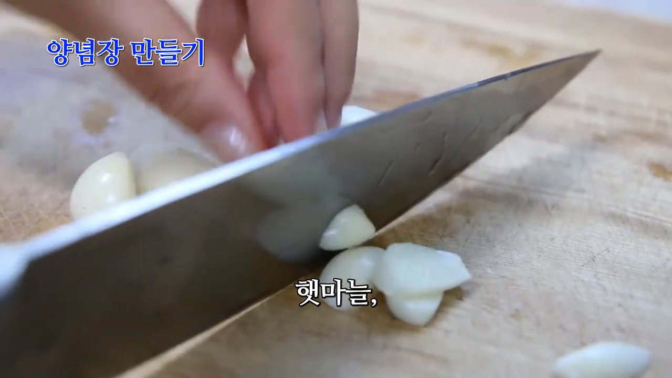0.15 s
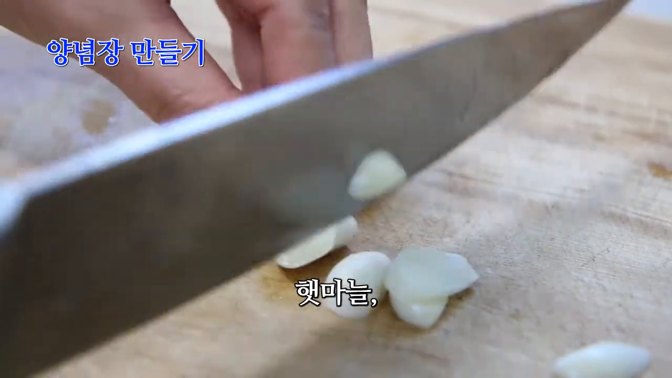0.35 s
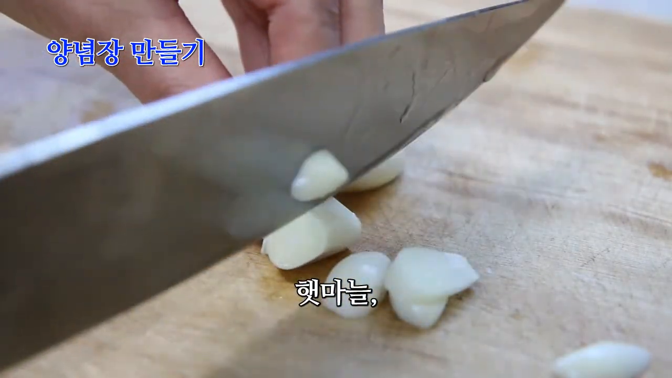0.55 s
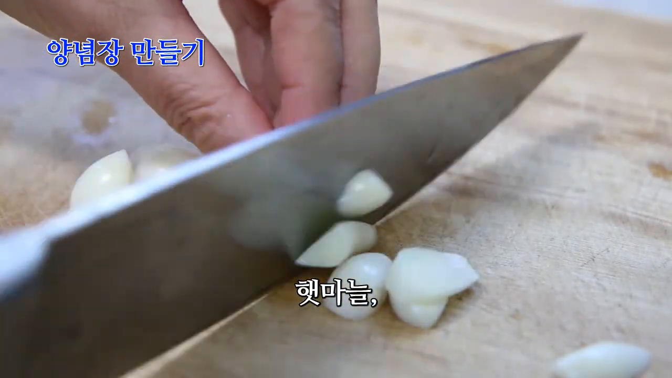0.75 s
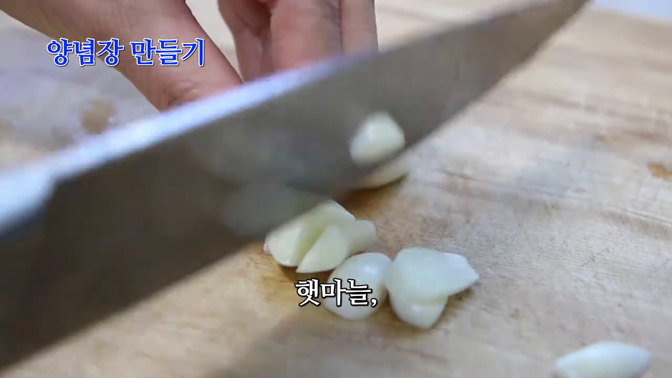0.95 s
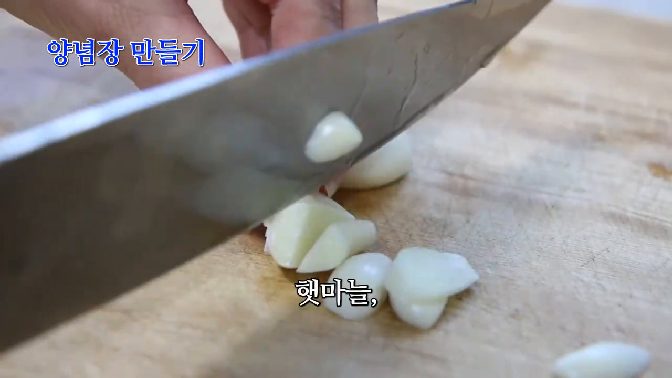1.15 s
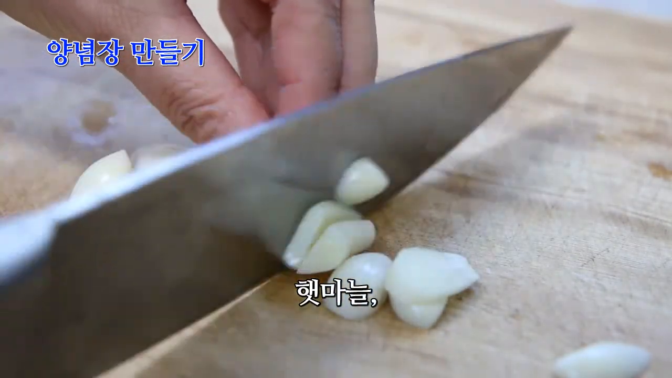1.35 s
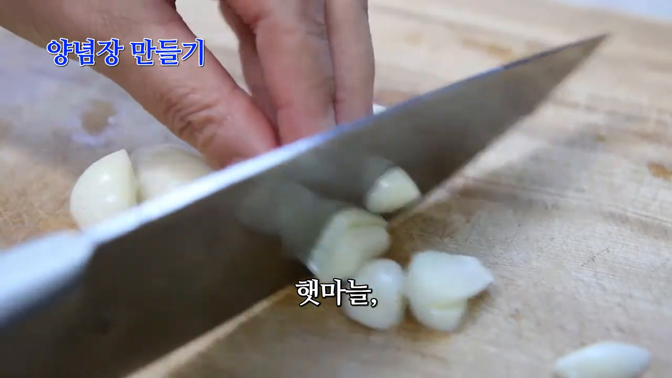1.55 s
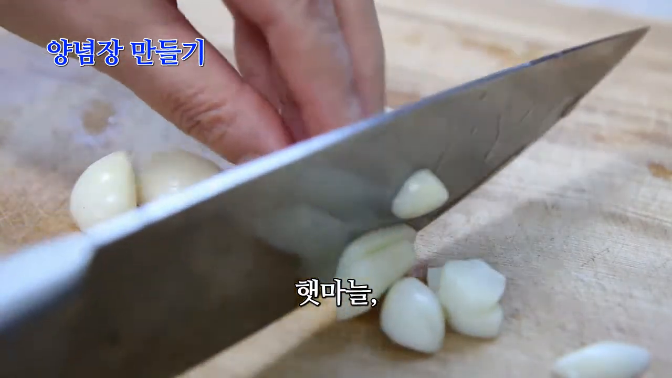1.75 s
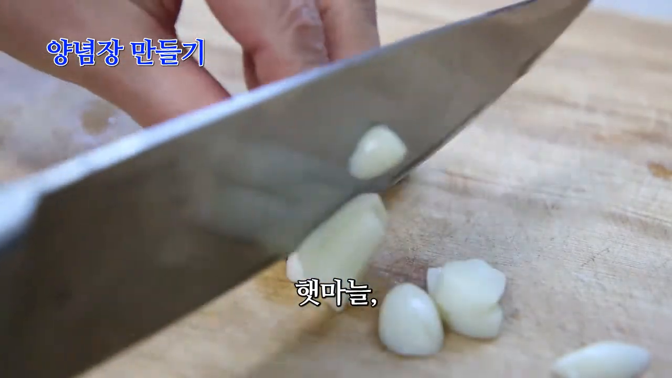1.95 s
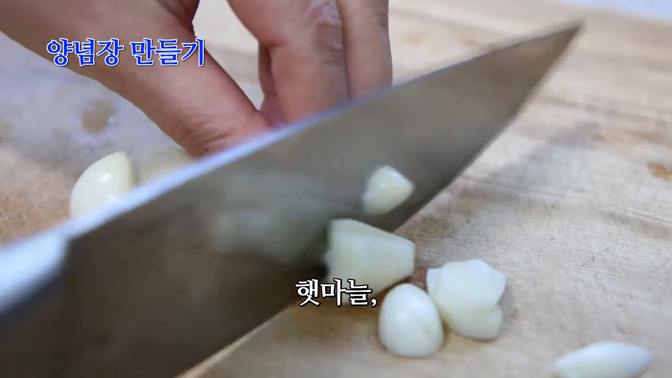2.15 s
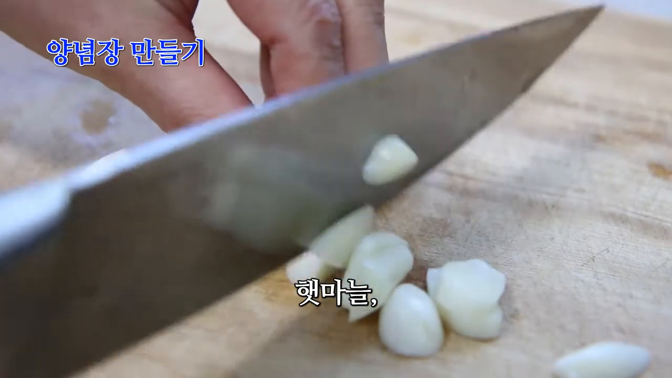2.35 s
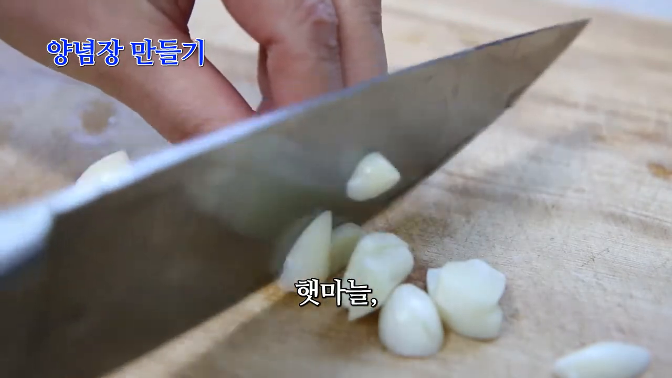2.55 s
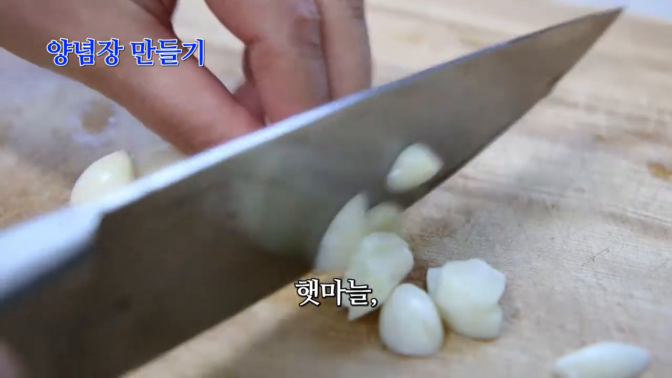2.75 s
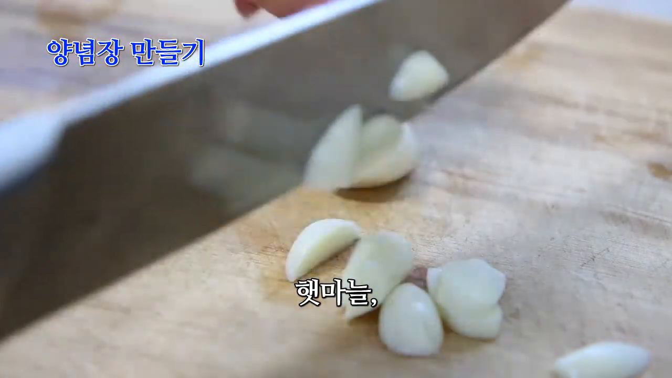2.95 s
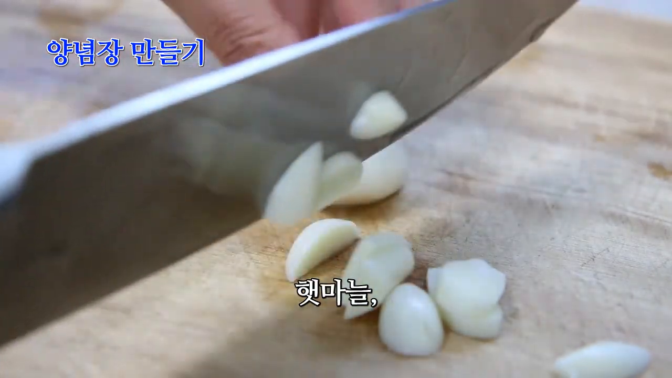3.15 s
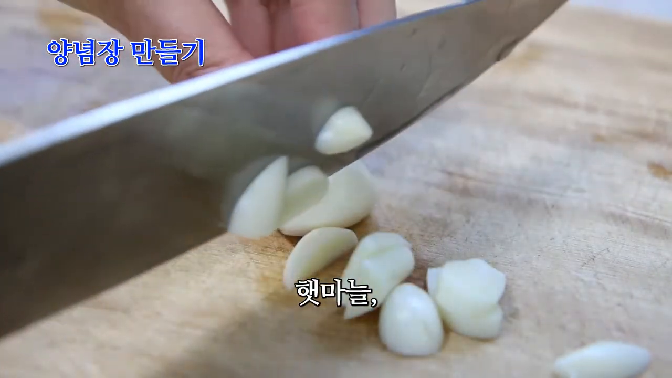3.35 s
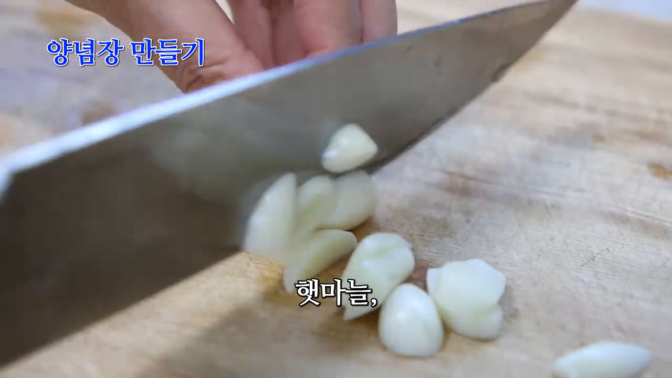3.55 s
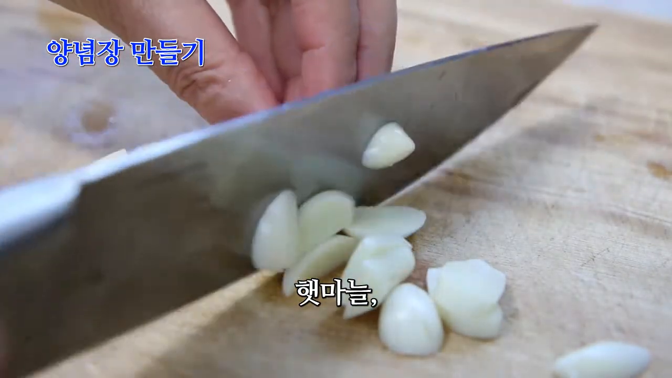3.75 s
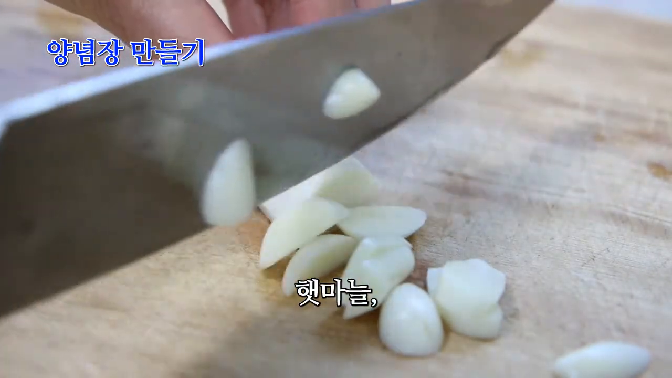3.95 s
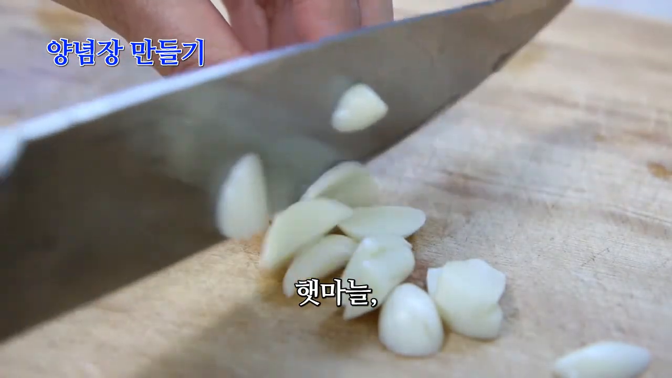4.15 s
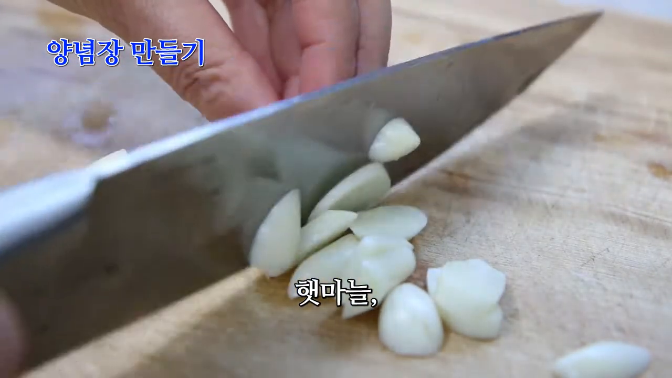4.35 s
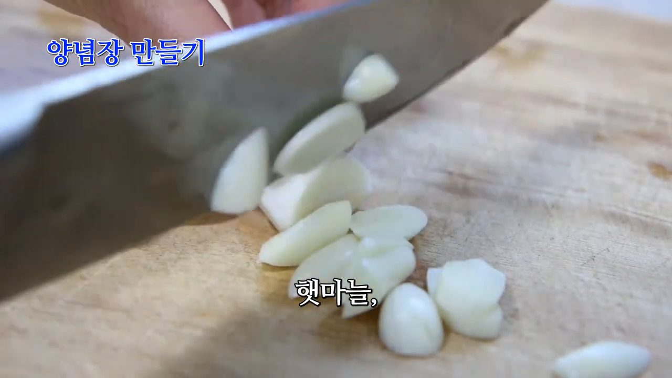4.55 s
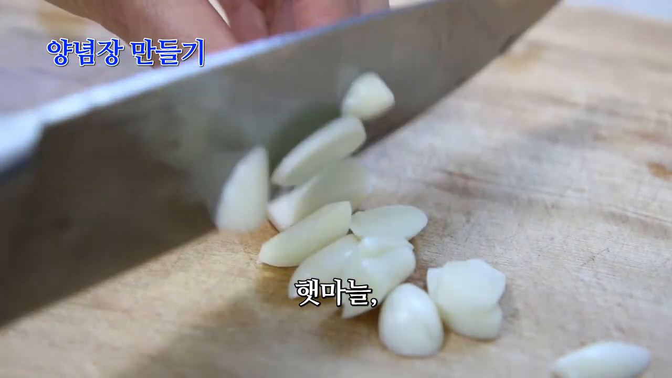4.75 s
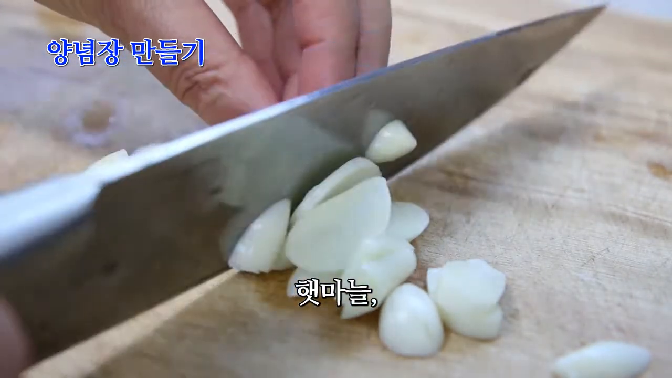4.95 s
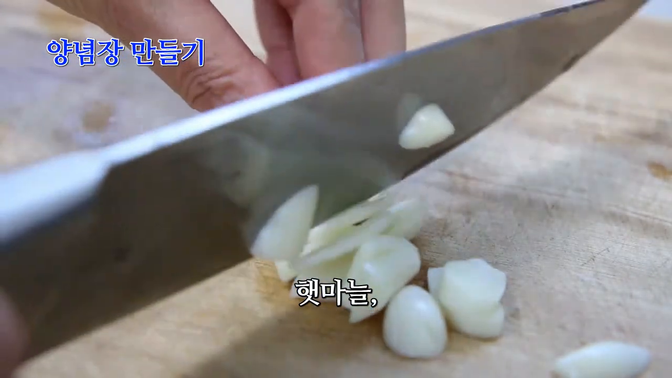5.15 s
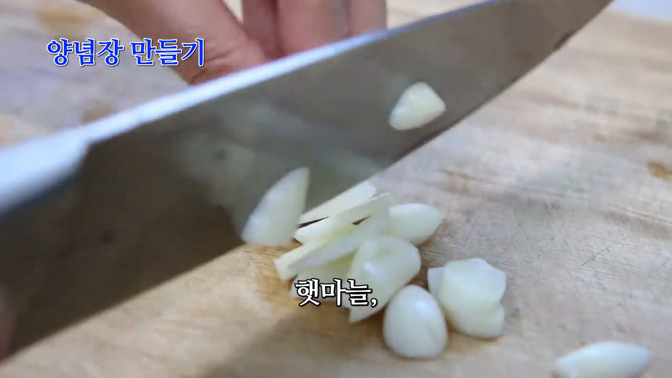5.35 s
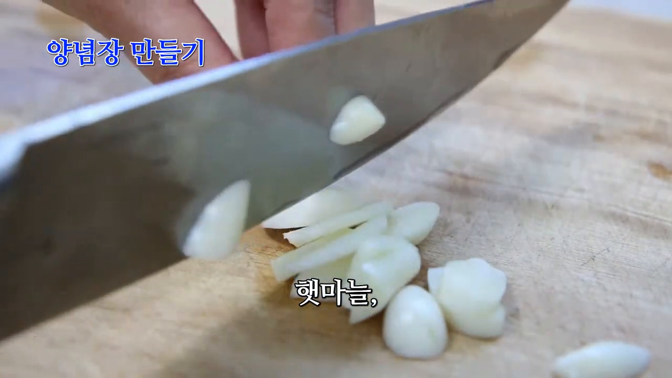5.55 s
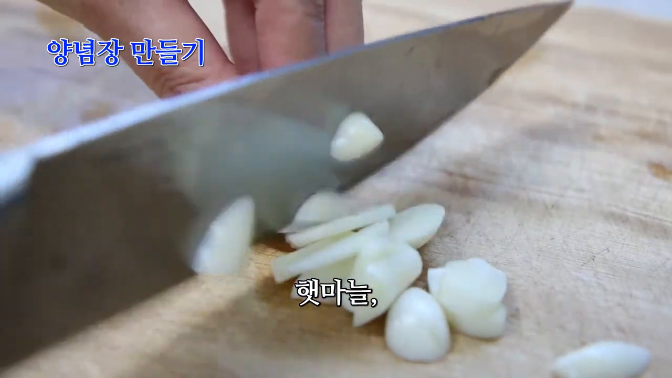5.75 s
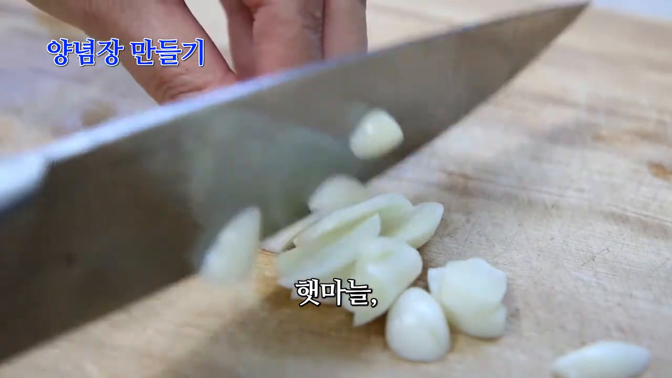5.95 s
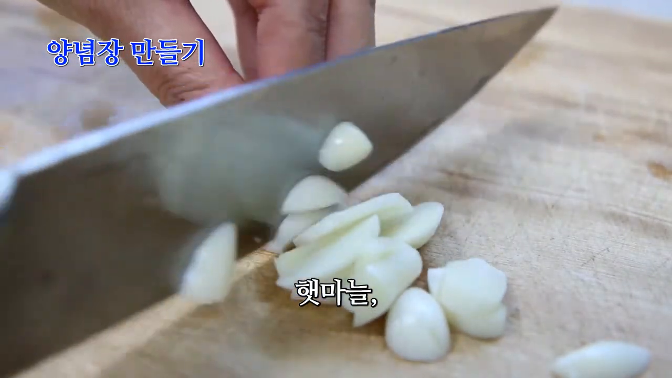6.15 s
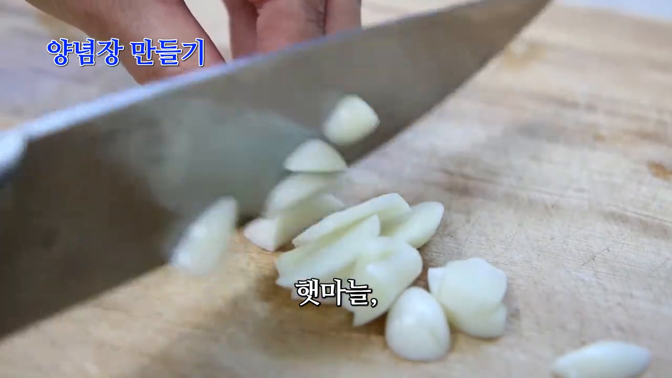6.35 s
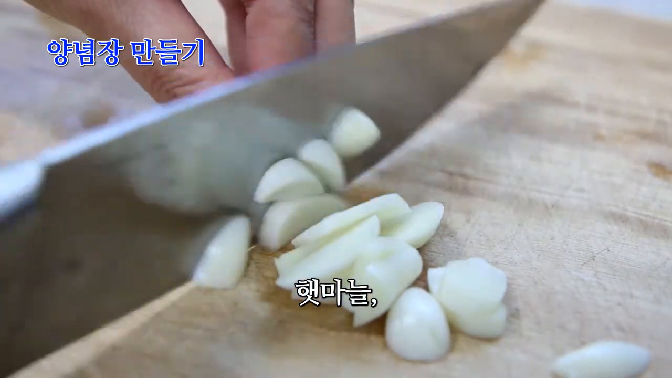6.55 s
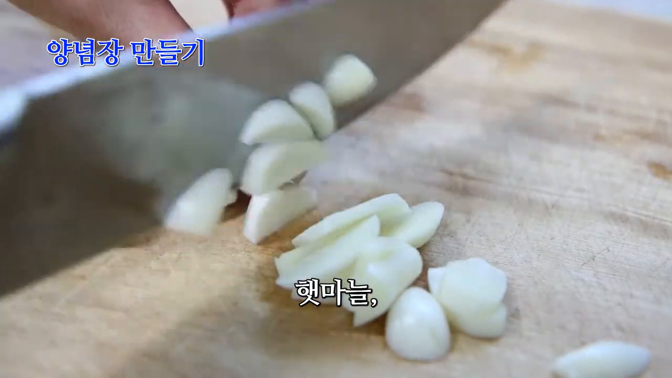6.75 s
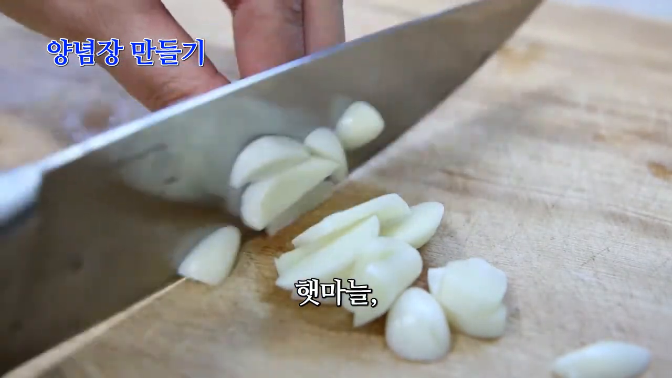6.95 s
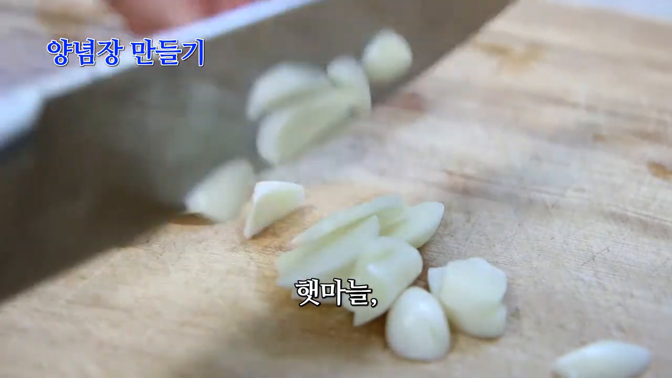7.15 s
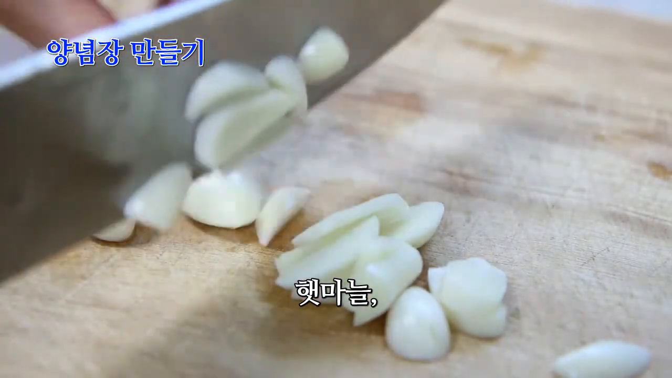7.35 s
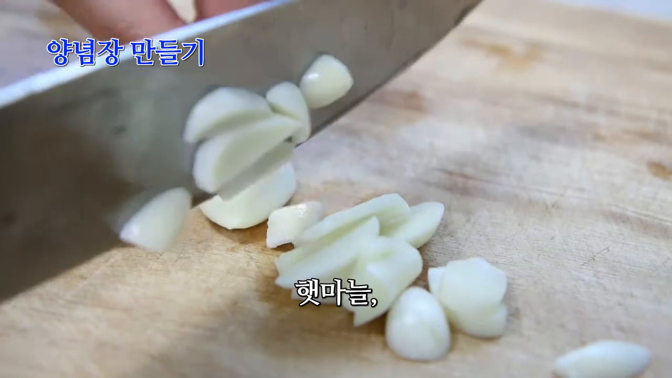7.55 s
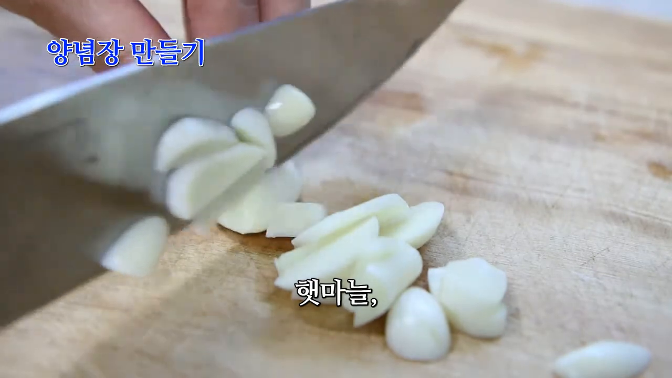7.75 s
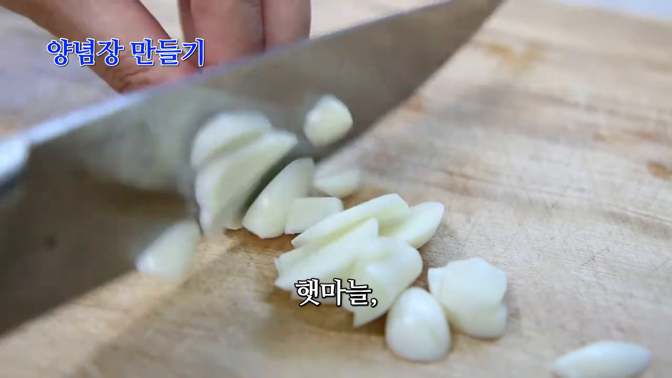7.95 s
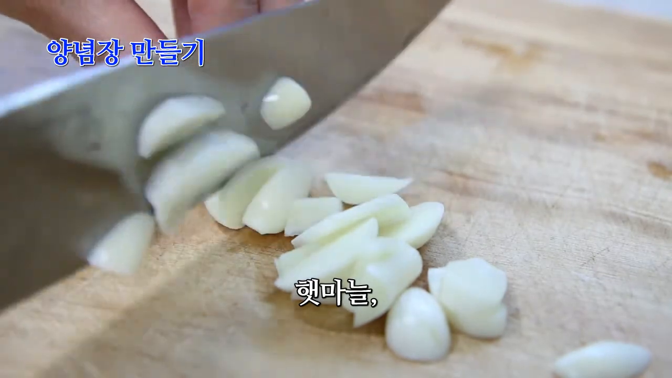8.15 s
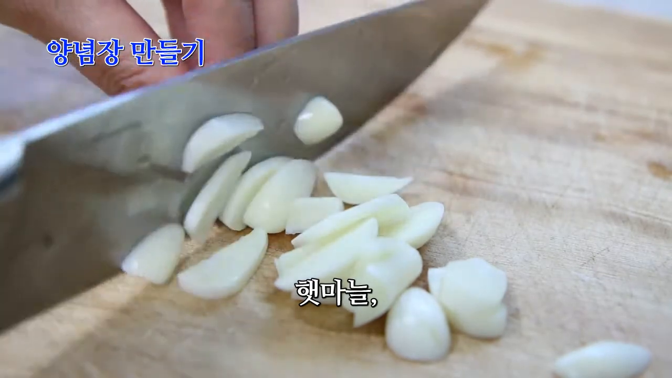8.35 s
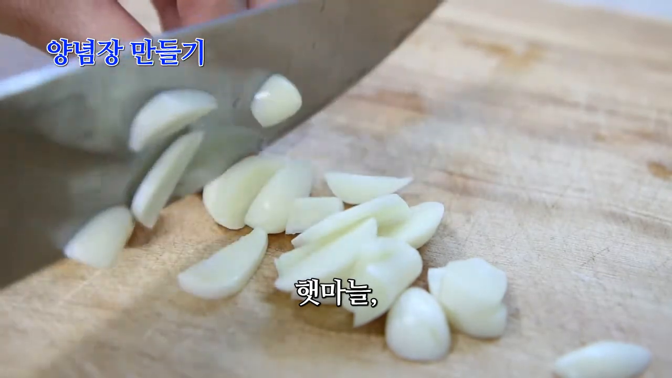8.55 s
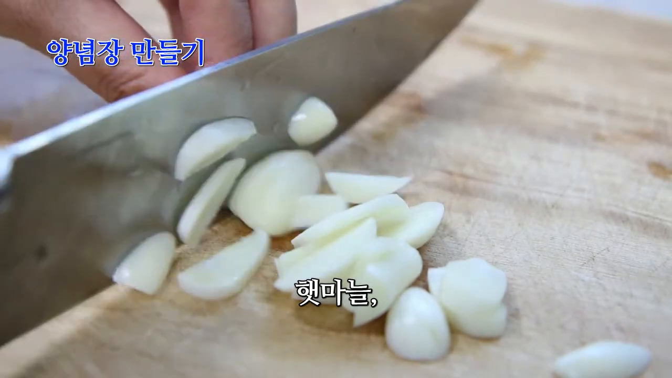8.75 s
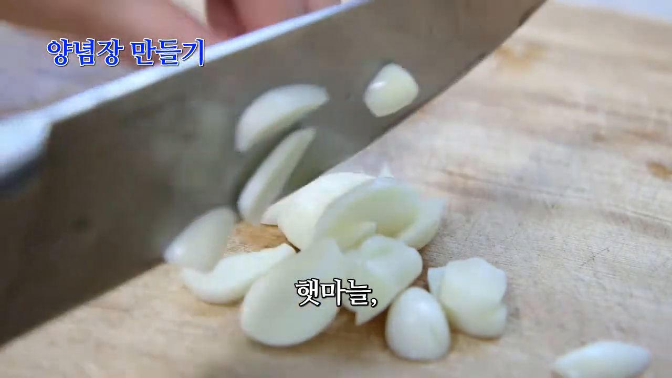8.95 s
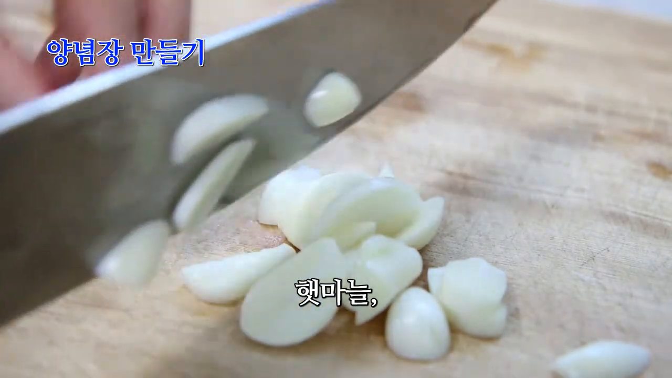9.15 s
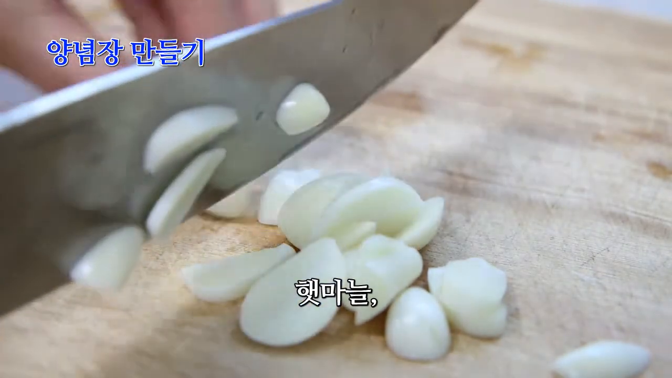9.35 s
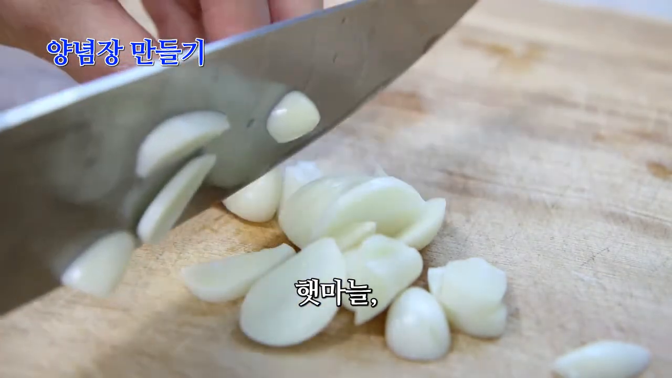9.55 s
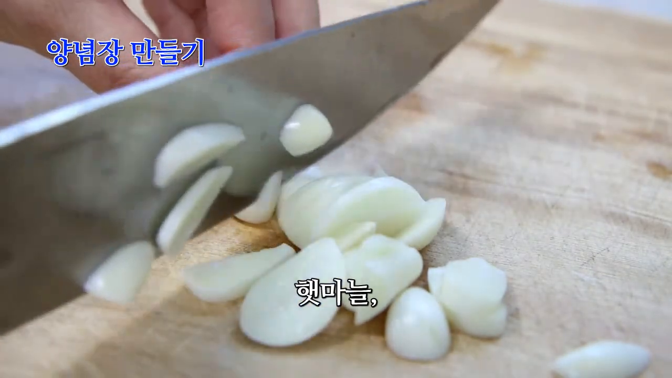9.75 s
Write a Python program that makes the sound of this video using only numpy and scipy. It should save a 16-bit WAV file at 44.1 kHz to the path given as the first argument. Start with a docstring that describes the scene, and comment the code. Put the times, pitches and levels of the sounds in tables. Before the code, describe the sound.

A kitchen knife slices garlic on a wooden board, each slow stroke a wet crisp crunch ending in a hard woody knock, close up.

```python
"""A chef's knife slices garlic on a wooden board in a small kitchen, close to the microphones.
On each stroke, bursting garlic cells crunch ever louder, then the knife knocks on the board.
Random clicks make the crunch; dying sines make the ringing board and blade.
Small bites, rubs and soft thuds fall around the strokes. Fading noise is the room's answer.
Behind it all, a wavering tone is an appliance's hum and steady noise is the room's air."""
import sys
import numpy as np
from scipy import signal
from scipy.fft import rfft, irfft
from scipy.io import wavfile
from scipy.ndimage import uniform_filter1d

SR = 44100
rng = np.random.default_rng(int(sys.argv[2]) if len(sys.argv) > 2 else 0)


def pcm_store(signal):
    """Save signal as 16-bit PCM."""
    levels = np.round(np.clip(np.atleast_2d(signal), -1, 1) * 32767)
    wavfile.write(sys.argv[1], SR, levels.astype(np.int16).T)


N = 432180  # length in samples
TIME = np.arange(N) / SR  # seconds

# Knife strokes; crunch and crack are relative levels, before colouring:
# [knock t/s, push on the board level/dB, cut length t/s, crunch at its end level/dB,
#  crack as the clove parts level/dB]
STROKES = [(.8720, 4.5, 0.21, -42.5, -29), (1.4776, 2, .16, -34, -37), (2.2820, 2, .12, -40.5, -27),
           (2.7160, 1.5, .12, -38, -25), (3.744, 5.5, 0.14, -36.5, -19), (4.3622, 4, .16, -37.5, -23),
           (4.9577, 5.5, .16, -36, -24.5), (5.9093, 6.5, .14, -43.5, -44), (6.3158, .5, .15, -43, -44),
           (6.6844, 1, .15, -40, -48), (7.0499, 1, .13, -43.5, -52), (7.9577, 2.5, 0.12, -33.5, -33),
           (8.3611, 2, .115, -32.5, -37), (8.7704, 2, .14, -38, -26.5)]
# The edge bites into a clove's skin; levels are relative:
# [t/s, crackle level/dB, blade ring level/dB, centre of the ring f/Hz]
SKIN_BITES = [(0.6167, -48, -50.5, 4300), (1.2243, -38.5, -36, 1160), (2.14, -39.5, -43.5, 1400),
              (2.5593, -42.5, -31.5, 4130), (4.0228, -50.5, -47.5, 3200), (4.69, -44, -41.5, 1460),
              (5.592, -46.5, -43, 6100), (5.8883, -33, -29, 5840), (6.1833, -38, -33.5, 1600),
              (6.5263, -49.5, -41.5, 1840), (6.9504, -40, -36.5, 1390), (7.797, -42.5, -39.5, 1160),
              (8.2359, -39.5, -34.5, 1430), (8.5786, -43.5, -47, 1500), (8.626, -48, -39, 1440)]
# Soft thuds: the first row is the fading thud of an earlier knock,
# in the others fingers nudge clove and blade on the board: [t/s, push level/dB]
SOFT_THUDS = [(.006, -16.5), (.107, -18), (.434, -22), (1.872, -21), (3.2075, -27)]


def cutting(blade_db=-43, blade_follows=0.61, release_s=0.0087, entry_s=0.015, crack_s=0.0015):
    """Garlic tears ever louder as the edge sinks in, and cracks as the edge meets the wood."""
    swell_db, swell_bend = 23.5, 1.26  # the rise is quick at first, then levels off towards the knock
    sound = np.zeros((2, N))
    t = TIME[:SR // 4]
    for knock_s, _, length_s, crunch_db, crack_db in STROKES:
        to_go = np.maximum(1 - t / length_s, 0)  # share of the cut still ahead
        after_s = np.maximum(t - length_s, 0)
        level_db = crunch_db - swell_db * to_go ** swell_bend
        gate = (1 - np.exp(-t / entry_s)) * np.exp(-after_s / release_s)
        crack = amp(crack_db) * (t > length_s) * np.exp(-after_s / crack_s)
        tear = amp(5) * (gate * amp(level_db) + crack)
        # the blade's ring grows less steeply than the crunch
        shake = gate * amp(blade_db + blade_follows * (level_db + 42.5))
        stroke = cut(tear, shake, centre_hz=1530, octaves=9.0, clump_db=3.0)
        add(sound, knock_s - length_s, stroke)
    return sound


def cut(tear, shake, centre_hz, octaves, clump_db=1.5, shared=0.99):
    """Cells burst in clumps and set the blade ringing, most strongly in the modes near centre_hz."""
    # The blade held in the clove, relative levels; time to fall by 60 dB: [f/Hz, level/dB, t/s]
    blade_modes = [(1127, -2, 0.053), (1390, -13, 0.012), (1448, 3, 0.017), (2220, -0.5, 0.012),
                   (2490, -2.5, 0.011), (3450, 2, 0.017), (4260, 3.5, 0.0065), (5700, 7, 0.0036)]
    # Spectrum of tearing garlic cells, relative, per Hz: [f/Hz, level/dB]
    crunch_spectrum = [(100, -20), (450, -3), (800, -6.5), (1800, 0.5), (4000, -1.5), (5600, -1),
                       (8000, -1.5), (10500, -1.5), (13000, -5.5), (16000, -9)]
    size = len(tear)
    modes = []
    for hz, db, t60 in blade_modes:
        distance = np.log2(hz / centre_hz) / octaves
        modes.append((hz, db - 6 * distance ** 2, t60))
    steel = ring(modes, rise_s=0.00005)
    steel = steel / np.linalg.norm(steel[0])
    sound = through(shake * bursts(size, per_s=12000, spread_db=0.4), steel)

    slow_noise = unit(uniform_filter1d(rng.standard_normal(size), size=180))
    clumps = unit(amp(clump_db * slow_noise))
    # the blade shades each microphone from the cells on its far face
    both, left, right = (bursts(size, per_s=5000, spread_db=1.0) for _ in range(3))
    clicks = unit(shared * both + np.array([left, right]))
    cells = colour(tear * clumps * clicks, crunch_spectrum)
    add(sound, 0, amp(2.0) * through(cells, worktop(scatter_db=3.5, t60=0.033)))
    return sound


def bursts(size, per_s, spread_db):
    """Cells burst at random, as clicks of uneven size."""
    loudness = amp(spread_db * np.minimum(rng.exponential(1, size), 4))
    clicks = loudness * rng.standard_normal(size)
    return unit(clicks * (rng.random(size) < per_s / SR))


def worktop(scatter_db, t60):
    """The direct sound is joined by quick scatter off board, hand and blade; energy is 1 in all."""
    t = TIME[:SR // 32]
    scatter = unit(diffuse(size=len(t)) * amp(-60 * t / t60))
    response = amp(scatter_db) * scatter / np.sqrt(len(t))
    response[:, 0] += 1  # the direct sound
    return response / np.linalg.norm(response[0])


def knocks(low_cut_hz=70, order=3):
    """The board rings under each push; nearby surfaces and then the room throw it back."""
    # The board with the knife on it, relative levels; time to fall by 60 dB: [f/Hz, level/dB, t/s]
    board_modes = [(99.7, -32.5, 0.21), (149, -37, 0.4), (169.7, -24.5, 0.12), (303.4, -22.5, 0.248),
                   (389, -22.5, 0.13), (403, -16, 0.15), (505, -28, 0.011), (545, -6.5, 0.04),
                   (611.6, -18.5, 0.11), (672.3, -27.5, 0.29), (706.6, -9.5, 0.029), (853, -20.5, 0.16),
                   (999, -24, 0.5), (1085, 1, 0.026), (1127, -10, 0.084), (1250, 0, 0.0071),
                   (1237.5, -16, 0.09), (1372, -0.5, 0.021), (1640, -14, 0.065), (1718, -20, 0.15),
                   (2058, -11.5, 0.066), (2233, 2, 0.012), (2497, -16, 0.093), (3073, -18, 0.077),
                   (3457, -11.5, 0.035)]
    # Spectrum of the knock sent out into the room, relative, per Hz: [f/Hz, level/dB]
    room_spectrum = [(40, -22), (80, -12), (135, -3.5), (245, -12), (330, -1.5), (450, 25.5), (640, -10.5),
                     (850, 5), (1060, 3), (1400, -2.5), (2200, -2), (3000, -8.5), (5000, -26), (12000, -73)]
    # Echoes off worktop, cupboards and walls, relative to the direct knock: [delay t/ms, level/dB]
    knock_echoes = [(5.5, -18), (11.9, -18.5), (20.4, -25), (27.5, -18.5), (46.5, -19.5), (71.5, -22.5)]
    bite_push_db = 10  # a bite's push on the board, above its blade ring
    contact_ms, harden = 0.24, 1.38  # contact of a 0 dB chop; dB it shortens for each dB of push
    force = np.zeros(N)
    direct = np.zeros((2, N))
    bites = [(s, ring_db + bite_push_db) for s, _, ring_db, _ in SKIN_BITES]
    for s, push_db in bites + SOFT_THUDS:
        add(force, s, amp(push_db) * blow(contact_ms=0.47))
    add(direct, 0, through(force, ring(board_modes, rise_s=0.0013)))
    for s, push_db, *_ in STROKES:
        # a harder chop is shorter and brighter
        push = amp(push_db) * blow(contact_ms * amp(-harden * push_db))
        add(force, s, push)
        add(direct, s, through(push, ring(board_modes, rise_s=0.0019)))
    sound = direct + amp(34) * through(force, kitchen(room_spectrum, build_s=0.014))
    for delay_ms, db in knock_echoes:
        add(sound, delay_ms / 1000, amp(db) * direct)
    # a small board cannot radiate deep bass
    high_pass = signal.butter(order, low_cut_hz, "high", fs=SR, output="sos")
    return signal.sosfilt(high_pass, sound)


def blow(contact_ms):
    """A smooth push of area 1 peaks after contact_ms, then fades; a longer contact is duller."""
    u = np.arange(1500) / SR * 1e3 / contact_ms
    force = u * np.exp(-u)
    return force / force.sum()


def ring(modes, rise_s, apart=0.21, vary_db=1.76, detune=0.01924):
    """Dying sines swell briefly, each strike varying a little in their strength and pitch."""
    t = TIME[:SR // 4]
    hz, db, t60 = np.transpose(modes)[:, :, None]
    hz = hz * (1 + detune * rng.standard_normal(hz.shape))
    # high modes reach the two microphones further out of step
    lag = apart * hz / 1000 * rng.choice([-1, 1], hz.shape)
    level_db = db + vary_db * rng.standard_normal(hz.shape) - 60 * t / t60
    size = amp(level_db) * (1 - np.exp(-t / rise_s))
    return np.array([(size * np.sin(2 * np.pi * hz * t + side * lag)).sum(0) for side in (-1, 1)])


def touches(snap_s=0.00092):
    """A bite is a sharp snap, then a short scrape; a rub is a soft hiss; a thud only stirs the blade."""
    # The flat of the blade rubs along a clove, relative levels: [t/s, crackle level/dB]
    blade_rubs = [(1.664, -50), (4.078, -51)]
    bite_s, rub_s, thud_s = 0.014, 0.052, 0.016  # how quickly each dies away
    thud_ring_db, thud_hz = -24, 1170  # blade ring relative to the push; centre of the ring
    sound = np.zeros((2, N))
    t = TIME[:SR // 4]
    still = np.zeros(len(t))
    bite = np.exp(-t / snap_s) + np.exp(-(t / bite_s) ** 2)
    for s, crackle_db, ring_db, centre_hz in SKIN_BITES:
        tear, shake = amp(crackle_db) * bite, amp(ring_db) * bite
        add(sound, s, cut(tear, shake, centre_hz, octaves=0.93, clump_db=-1.0))
    for s, crackle_db in blade_rubs:
        tear = amp(crackle_db) * np.exp(-(t / rub_s) ** 2)
        add(sound, s, cut(tear, still, thud_hz, octaves=1))
    for s, push_db in SOFT_THUDS:
        shake = amp(push_db + thud_ring_db) * np.exp(-t / thud_s)
        add(sound, s, cut(still, shake, thud_hz, octaves=0.5))
    return sound


def kitchen(spectrum, build_s):
    """The room's tail for a source of this spectrum builds up, then each band dies at its own speed."""
    # How long the room takes to fall by 60 dB: [f/Hz, t/s]
    room_fade = [(100, 0.12), (400, 0.53), (1000, 0.59), (2500, 0.59), (6000, 0.56), (14000, 0.38)]
    hz, t, z = signal.stft(diffuse(size=SR), SR, nperseg=256)
    z = z * amp(read(spectrum, hz)[:, None] - 60 * t / read(room_fade, hz)[:, None])
    tail = signal.istft(z, SR, nperseg=256)[1][:, :SR]
    build = 1 - np.exp(-(TIME[:SR] / build_s) ** 2)
    return tail * build / np.sqrt(SR)


def diffuse(size):
    """White noise comes from all sides to two close microphones: alike in the bass, not in the treble."""
    # Left-right likeness of sound from all sides: [f/Hz, likeness/1]
    likeness = [(60, 0.91), (300, 0.96), (700, 0.88), (1400, 0.79), (3000, 0.18), (7000, 0.022)]
    mid, side = rfft(rng.standard_normal((2, size)))
    alike = np.clip(read(likeness, np.fft.rfftfreq(size, 1 / SR)), 0, .995)
    mid = mid * np.sqrt((1 + alike) / 2)
    side = side * np.sqrt((1 - alike) / 2)
    return irfft([mid + side, mid - side], size)


def hum(waver_hz=2.25, flutter=0.19, stop_s=0.085):
    """An appliance drones on one tone, wavering in pitch and level, then stops."""
    hum_hz, hum_db, fade_start_s = 174.6, -59.5, 9.35
    knots = np.linspace(0, TIME[-1], 150)
    drift, swell = (np.interp(TIME, knots, row) for row in rng.standard_normal((2, len(knots))))
    turns = np.cumsum(hum_hz + waver_hz * drift) / SR
    running = np.clip((fade_start_s - TIME) / stop_s + 1, 0, 1)
    level = np.sqrt(2) * amp(hum_db) * running * (1 + flutter * swell)
    return level * np.sin(2 * np.pi * turns)


def air(level_db=-49.5):
    """The room's air is steady noise from all sides, coloured by a spectrum."""
    # Spectrum of the room's air, relative, per Hz: [f/Hz, level/dB]
    air_spectrum = [(15, -46), (25, -16), (84, -8.5), (140, -9), (169, 0.5), (204, -8.5), (240, -7.5),
                    (340, -5.5), (399, -3.5), (1050, -13), (1140, -4.5), (1340, -17.5), (1450, -14),
                    (2120, -20.5), (15500, -33.5)]
    return amp(level_db) * unit(colour(diffuse(size=N), air_spectrum))


def amp(db):
    """Turns decibels into a gain."""
    return 10 ** (np.asarray(db) / 20)


def unit(x):
    """Scales to an rms (average strength) of 1."""
    return x / np.sqrt(np.mean(x ** 2) + 1e-20)


def read(points, hz):
    """Reads values between a curve's points, on a log-frequency axis."""
    f, value = np.transpose(points)
    return np.interp(np.log(hz + 1), np.log(f + 1), value)


def add(mix, s, sound):
    """Mixes a sound in at time s, in seconds."""
    part = mix[..., max(round(s * SR), 0):][..., :sound.shape[-1]]
    part += sound[..., :part.shape[-1]]


def colour(x, points):
    """Filters a sound by a spectrum in dB."""
    size = x.shape[-1]
    gain = amp(read(points, np.fft.rfftfreq(size, 1 / SR)))
    return irfft(rfft(x) * gain, size)


def through(x, response):
    """Passes a sound through a one- or two-channel response."""
    return signal.fftconvolve(np.atleast_2d(x), np.atleast_2d(response), axes=1)[:, :N]


def scene():
    """Crunch and knocks sound near and through the room, over the hum and the air."""
    crunch = cutting() + touches()
    crunch_spectrum = [(1000, 10.8), (5000, 5.9), (15000, 1.9)]  # sent into the room: [f/Hz, level/dB]
    crunch_room = through(crunch, kitchen(crunch_spectrum, build_s=0.0064))
    return knocks() + crunch + crunch_room + hum() + air()


def record(dry, threshold_db=-4.0, recover_db_per_s=55, edge_hz=15900):
    """A limiter ducks the hardest knocks and lets their tails swell back; then clipping and a low-pass."""
    level_db = 20 * np.log10(abs(dry).max(0) + 1e-9)
    over_db = np.maximum(level_db - threshold_db, 0)
    fall = TIME * recover_db_per_s
    held_db = np.maximum.accumulate(over_db + fall) - fall  # jumps up at once, falls steadily
    duck_db = signal.lfilter(np.ones(100) / 100, 1, held_db)  # smoothed over 100 samples
    low_pass = signal.firwin(511, edge_hz, window=("kaiser", 9), fs=SR)
    clipped = np.clip(dry * amp(-duck_db), -1, 1)
    return signal.oaconvolve(clipped, low_pass[None], "same")


dry = scene()
out = record(dry)
pcm_store(out)
```